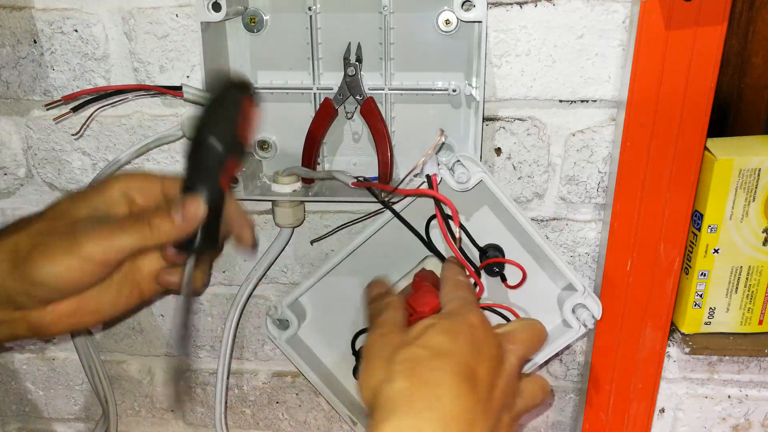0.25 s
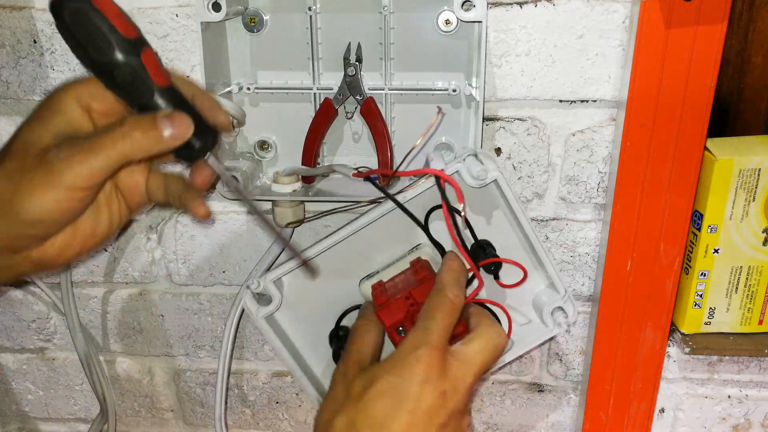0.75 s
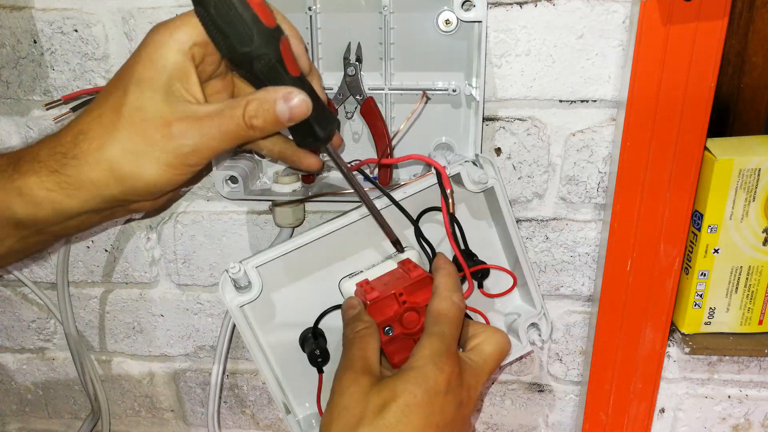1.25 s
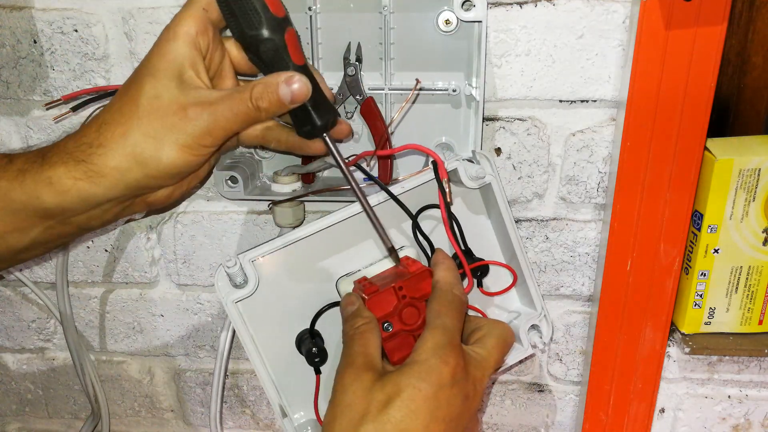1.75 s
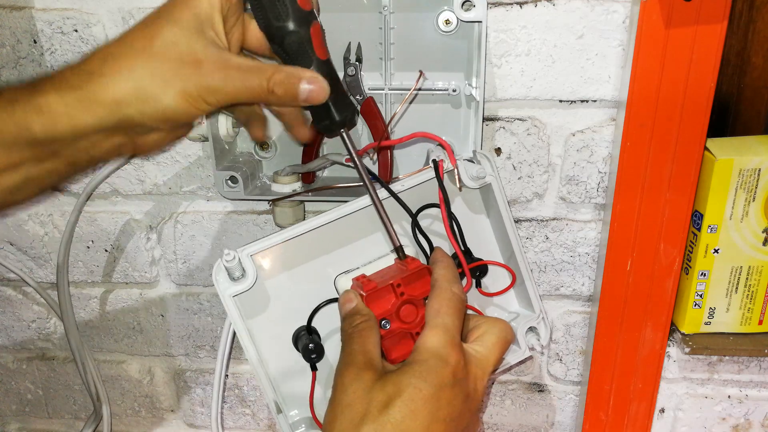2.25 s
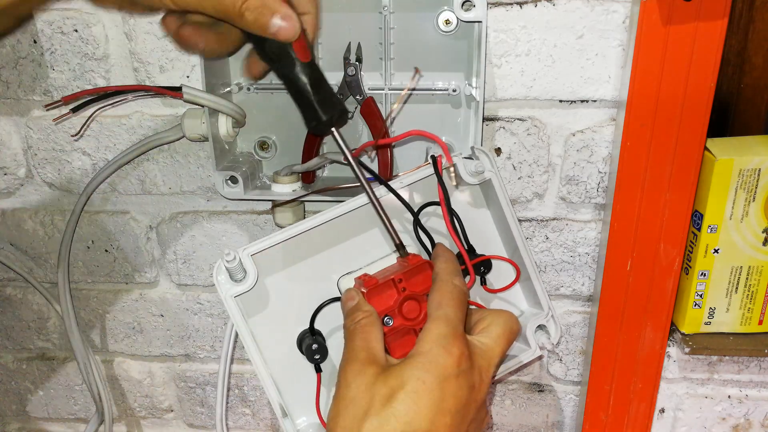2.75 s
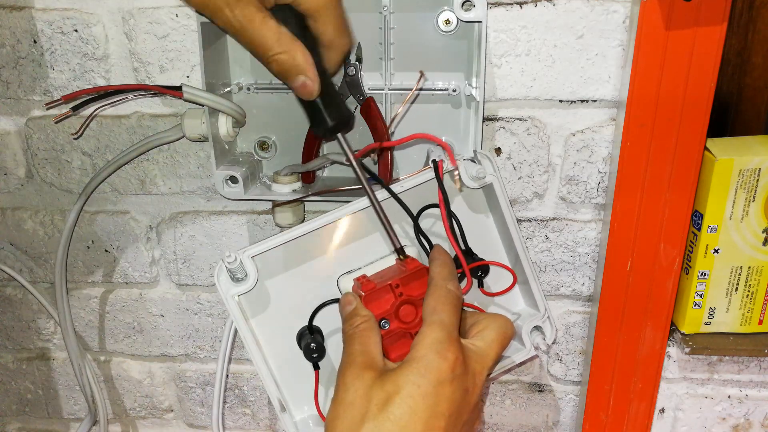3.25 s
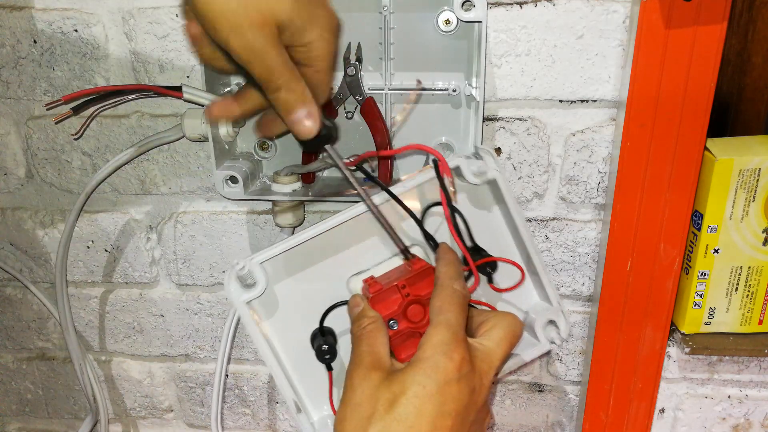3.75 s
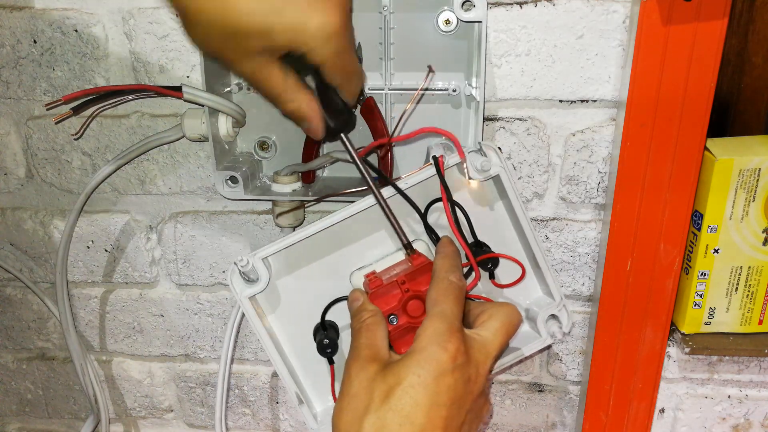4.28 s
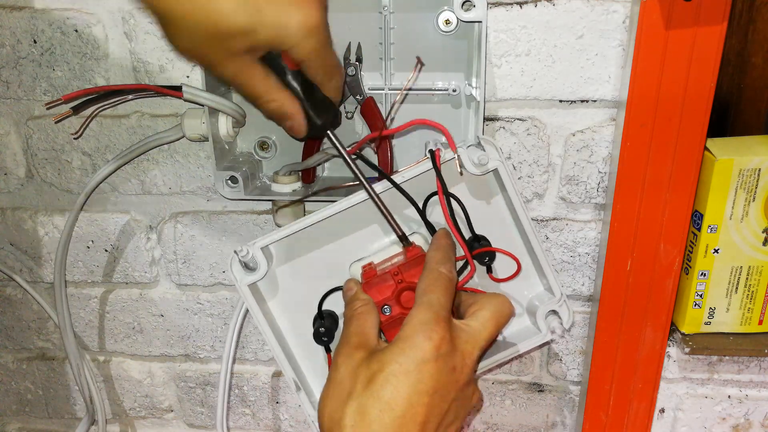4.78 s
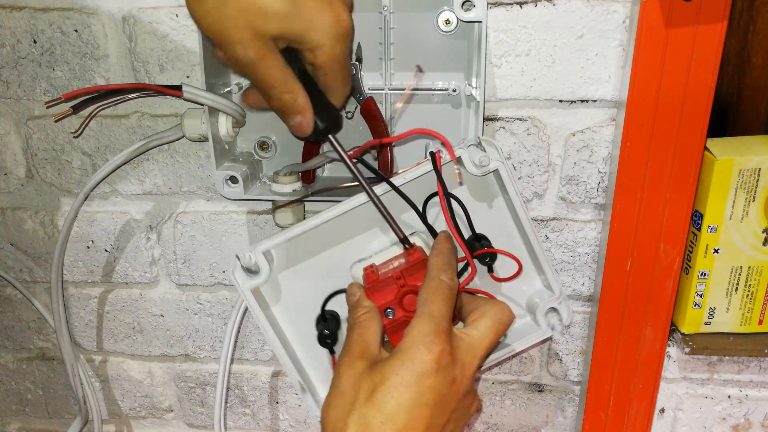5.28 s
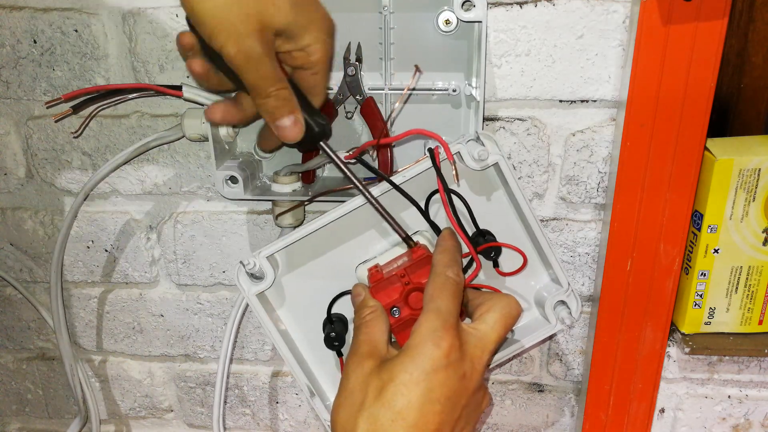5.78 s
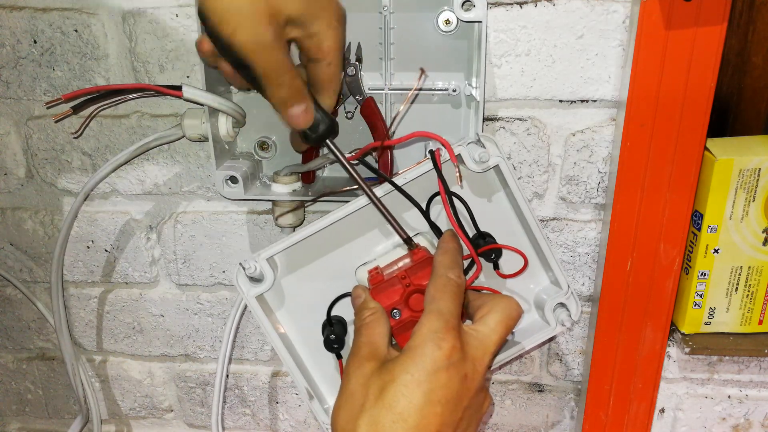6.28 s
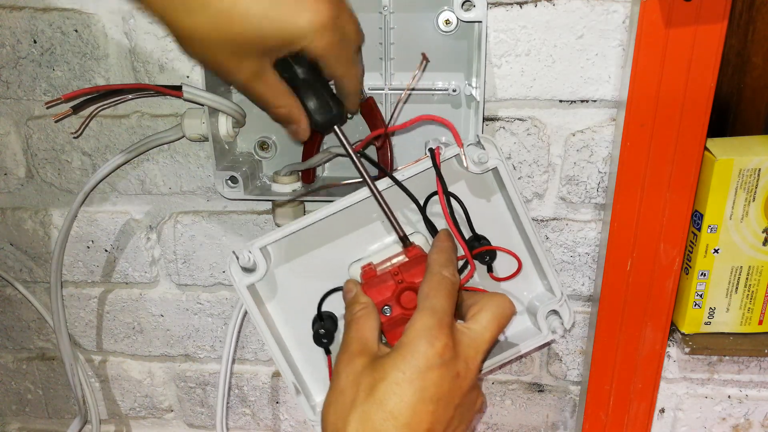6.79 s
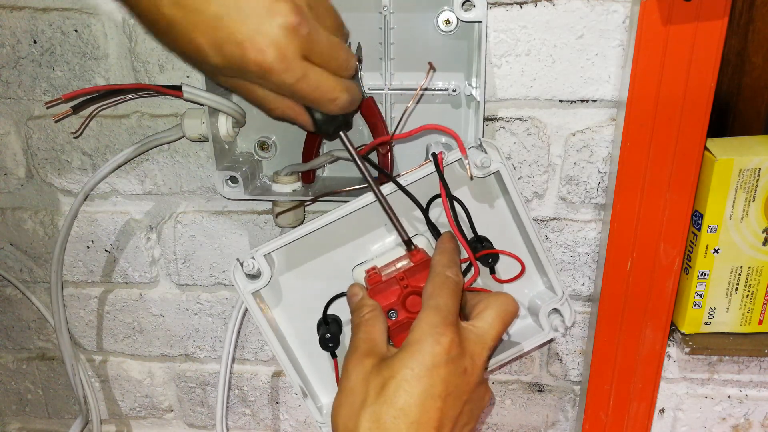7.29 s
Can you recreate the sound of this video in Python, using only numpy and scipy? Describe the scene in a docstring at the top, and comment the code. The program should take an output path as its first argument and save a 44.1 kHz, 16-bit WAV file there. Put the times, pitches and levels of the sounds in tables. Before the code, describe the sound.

A close stereo microphone hears screwdriver work left of centre in a small quiet room, with a quick brick-wall echo, short tail, low rumble and thin hiss. At 0.25-0.4 s the plastic fitting chatters softly as it is picked up; wires drag, and taps and knocks gather at 0.55-0.95, with a crack and slap at 0.7. After faint ticks and a tiny squeak near 1.15, gritty steel skids and squeaks cluster at 1.4-1.65 and 1.95-2.05. It is sparse until a knock and dry palm rub at 2.7-2.9. Light ticks lead to the loudest metal crack and plastic slap at 3.8, then a strong hollow knock near 4. Uneven knocks, tinks and taps continue, with a squeak at 4.77, a hard skid at 4.97, a busy clatter at 6.5-6.7, a low scuff and squeak at 6.9, and sparse light clicks to 7.5.

```python
"""A screwdriver tightens a small terminal screw in a plastic fitting held against a junction box lid.
Its tip clicks and slips in the screw head: short jerks and gritty noise ring the plastic and steel modes.
Uneven slips make squeaks, scrapes and a low scuff; wires drag in tiny catches; skin rubs as coloured noise.
A brick wall close behind gives one quick echo, and a small quiet room adds a noise tail and a low rumble."""
import sys
import numpy as np
from scipy import signal
from scipy.fft import rfft, irfft, next_fast_len
from scipy.io import wavfile

SR = 44100
rng = np.random.default_rng(int(sys.argv[2]) if len(sys.argv) > 2 else 0)


def int16_out(signal):
    """Quantize to a 16-bit WAV file."""
    q = np.round(np.clip(np.atleast_2d(signal).T, -1, 1) * 32767)
    wavfile.write(sys.argv[1], SR, q.astype(np.int16))


N = 332073
T = np.arange(N) / SR  # time in seconds


def amp(db):
    """Turns decibels into gain."""
    return 10 ** (np.asarray(db) / 20)


def unit(x):
    """Scales a sound to an rms of 1."""
    return x / np.sqrt(np.mean(x ** 2) + 1e-20)


def swell(t, middle, half):
    """A smooth rise and fall that peaks at 1."""
    return np.exp(-((t - middle) / half) ** 2)


def read(points, hz):
    """Reads a curve of (pitch, value) points, evenly spaced in log pitch."""
    point_hz, value = np.transpose(points)
    return np.interp(np.log(hz + 1), np.log(point_hz + 1), value)


def level_curve(points):
    """Joins (time, dB) points into a gain over time, near silent outside them."""
    s, db = np.transpose(points)
    return amp(np.interp(T, s, db, -120, -120))


def colour(x, points):
    """Filters by a smooth curve of (pitch_hz, level_db)."""
    hz = np.fft.rfftfreq(x.shape[-1], 1 / SR)
    return irfft(rfft(x) * amp(read(points, hz)), x.shape[-1])


def noise(points):
    """Coloured noise with an rms of 1."""
    white = rng.standard_normal(next_fast_len(N))
    return unit(colour(white, points)[:N])


def band(x, lo, hi, order=3):
    """Keeps the range from lo to hi in Hz."""
    return signal.sosfilt(signal.butter(order, [lo, hi], "band", fs=SR, output="sos"), x)


def grains(per_s, spread_db):
    """Tiny slips of uneven size at random moments, scaled to an rms of 1."""
    size = amp(spread_db * np.minimum(rng.exponential(1, N), 4)) * rng.standard_normal(N)
    happens = rng.random(N) < per_s / SR
    return unit(size * happens)


# what the fitting, lid and shaft ring with, before a small random spread: pitch_hz, width_hz, level_db
RINGING_MODES = [(513, 102, -27), (702, 74, -14.5), (998, 57, -14.5), (1311, 192, -5.5), (1530, 55, -8.5),
                 (1885, 132, -7.5), (2140, 120, -10.5), (2350, 105, -13), (2397, 340, -13.5),
                 (2600, 78, -20), (2930, 450, -13), (3480, 460, -16.5), (3810, 990, -16.5),
                 (4460, 250, -26), (5000, 800, -20.5), (5870, 50, -19), (6730, 390, -17), (7770, 110, -18),
                 (8120, 1700, -22.5), (9530, 230, -33), (12400, 1400, -35)]


def body(plastic_hz, favours, plastic_db=4, top_db=0):
    """Dying sine modes of the assembly; the point of contact favours some of the plastic and shaft modes."""
    t = T[:2600]
    hz, width, db = np.transpose(RINGING_MODES)[:, :, None]
    db = db + plastic_db * swell(hz, plastic_hz, 100)
    db = db + sum(lift_db * swell(hz, shaft_hz, 225) for shaft_hz, lift_db in favours)
    db = db + top_db * (hz > 10000)
    db = db + 1.5 * rng.standard_normal(hz.shape)
    hz = hz * (1 + .012 * rng.standard_normal(hz.shape))
    # upper mode shapes push or pull at the contact
    sign = np.where(hz > 1700, rng.choice([-1, 1], hz.shape), 1)
    # a wider mode dies sooner; the width factor keeps its peak level in the spectrum
    modes = sign * amp(db) * width * np.exp(-np.pi * width * t) * np.sin(2 * np.pi * hz * t)
    return modes.sum(0) * 2 * np.pi / SR


# the ranges of thud, plastic ring, shaft ring and tick: low_hz, high_hz
RANGES_HZ = [(520, 860), (930, 1780), (2020, 4500), (4950, 15200)]
RANGE_FILTERS = [signal.butter(order, edges, "band", fs=SR, output="sos")
                 for order, edges in zip((2, 4, 4, 4), RANGES_HZ)]


def contact(s, levels_db, slip_s, modes, slip_share, creep_s, scatter_db,
            snap_share=0.57, bare_db=-25, scatter_s=0.015):
    """The tip creeps, snaps and slips on grit; this rings the body and scatters differently to each side."""
    t = T[:2600] - T[132]  # the snap falls at 0, the creep starts 3 ms before
    grit = rng.standard_normal((3, len(t)))
    slip = grit[0] * np.exp(-abs(t) / np.where(t < 0, creep_s, max(2.5 * slip_s, .0003)))
    scatter = grit[1:] * np.exp(-abs(t) / scatter_s) * (t > 0)
    force = slip_share * slip / np.linalg.norm(slip)
    force = force + amp(scatter_db) * scatter / np.linalg.norm(scatter[0])
    snap = snap_share * (t == 0)
    ring = signal.fftconvolve(force + snap, modes[None], axes=1)[:, :len(t)]
    ring = ring + amp(bare_db) * (force + 0.2 * snap)  # some of the bare force is heard too
    sound = 0
    for db, sos in zip(levels_db, RANGE_FILTERS):
        part = signal.sosfilt(sos, ring)
        # each range gets its own level, set by its opening on the left
        strength = np.sqrt(np.sum(part[0, t < .012] ** 2) / (.01 * SR))
        sound = sound + amp(db) * part / strength
    return s + t[0], sound


def played(contacts, right_db=0):
    """Lays contacts out in time on both sides."""
    out = np.zeros((2, N))
    for s, sound in contacts:
        start = max(round(s * SR), 0)
        part = out[:, start:start + sound.shape[1]]
        part += sound[:, :part.shape[1]]
    return out * amp([[0], [right_db]])


# tone of the room's rumble and hiss: pitch_hz, level_db
FLOOR_COLOUR = [(12, -19), (20, 7), (48, 2), (146, -4), (347, -13.5), (388, -11.5), (422, -14.5),
                (802, -11.5), (949, -12), (1330, -13), (2080, -20.5), (3070, -19), (5680, -23.5),
                (6180, -24), (16000, -33.5)]
# how alike the left and right rumble are: pitch_hz, likeness (-1 to 1)
FLOOR_LIKENESS = [(60, 1), (130, 1), (290, 0.85), (640, -0.84), (1400, 0.34), (3000, -0.027)]
# swelling of the rumble; the filter below deepens it in the lowest range: start_s, level_db
RUMBLE_SWELLS = [(0, -1), (1.2, 0), (2.8, 0), (3.6, 0), (4.2, 2), (5.1, -0.5), (5.8, 1), (6.5, 0.5),
                 (7.53, -0.5)]


def floor(level_db=-53, left_db=1.2):
    """Low room rumble, alike on both sides and slowly swelling, under a thin steady hiss."""
    a, b = rfft(np.array([noise(FLOOR_COLOUR), noise(FLOOR_COLOUR)]))
    same = np.clip(read(FLOOR_LIKENESS, np.fft.rfftfreq(N, 1 / SR)), -1, 1)
    left = a * amp(left_db)
    right = same * a + np.sqrt(1 - same ** 2) * b
    bed = amp(level_db) * irfft(np.array([left, right]), N)
    low = colour(bed, [(170, 6), (400, -35), (900, -52)])
    return bed + low * (amp(np.interp(T, *np.transpose(RUMBLE_SWELLS))) - 1)


# wires dragging over the plastic, one list per drag, before gain_db: start_s, level_db
WIRE_DRAGS = [
    [(0.25, -49), (0.42, -67)],
    [(0.53, -54), (0.608, -50.5), (0.73, -41), (0.798, -41.5), (0.934, -51), (1.0, -60)],
    [(3.29, -51), (3.42, -71)],
    [(3.55, -65), (3.652, -60), (3.75, -84)],
    [(4.66, -53), (4.784, -46), (4.86, -44.5)],
]


def wires(gain_db=-2, resting_db=-67, soft_hz=3200):
    """Soft insulation catches on the plastic in tiny ringing slips; the held wires never lie quite still."""
    slips = grains(per_s=1300, spread_db=1.5)
    drag = signal.oaconvolve(slips, body(1850, [(2350, 4)], plastic_db=5))[:N]
    drag = unit(band(drag, 580, soft_hz))
    level = amp(gain_db) * sum(level_curve(rows) for rows in WIRE_DRAGS)
    return (level + amp(resting_db)) * drag


# tone of skin on the handle: pitch_hz, level_db
SKIN_TONE = [(1000, -7), (3500, 0), (6000, -0.5), (9000, 1), (12500, -5), (16000, -4)]
# fingertips sliding on the handle, before gain_db: middle_s, half_length_s, level_db
FINGER_STROKES = [(0.24, 0.023, -52), (3.169, 0.051, -54), (3.575, 0.033, -58.5), (3.685, 0.11, -52),
                  (4.11, 0.11, -54), (4.556, 0.057, -50.5), (4.887, 0.047, -57), (5.073, 0.058, -56),
                  (5.173, 0.037, -60), (6.335, 0.028, -53)]


def fingertips(gain_db=2):
    """A soft hiss of skin at each fresh hold on the handle."""
    level = sum(amp(db + gain_db) * swell(T, s, half_s) for s, half_s, db in FINGER_STROKES)
    return noise(SKIN_TONE) * level


# levels of the four ranges in a rattle tap: thud_db, plastic_ring_db, shaft_ring_db, tick_db
RATTLE_LEVELS = (-11.5, -1, -10, -20.5)
# shaft modes that rattle and taps bring out: pitch_hz, lift_db
TAP_LIFTS = [(2050, 11)]


def rattle(start_s=.274, gap_s=.0177, level_db=-41, spread_db=2, count=7, slip_s=0.0017,
           plastic_hz=1290, grind_db=-8, jitter_s=0.0019):
    """The fitting chatters on the lid as it is picked up: a loose chain of tiny, uneven taps."""
    chain = []
    for k, (late, hard) in enumerate(rng.standard_normal((count, 2))):
        s = start_s + k * gap_s + jitter_s * late
        levels_db = np.add(RATTLE_LEVELS, level_db + spread_db * hard)
        modes = body(plastic_hz, TAP_LIFTS, plastic_db=12, top_db=grind_db)
        chain.append(contact(s, levels_db, slip_s, modes, slip_share=0.42, creep_s=0.0013, scatter_db=-3.5))
    return played(chain)


# levels of the four ranges in a tap: thud_db, plastic_ring_db, shaft_ring_db, tick_db
TAP_LEVELS = (-21, 0.5, 1, -21)
# the fitting rocks and settles: start_s, level_db, shaft_ring_db (added to the shaft ring's level)
PLASTIC_TAPS = [(0.559, -45.5, -7), (0.68, -38, 5.5), (0.721, -35.5, -7), (0.8255, -37.5, -20),
                (1.0807, -48.5, -11), (2.457, -51, -12), (3.0725, -48.5, -13), (3.825, -27, -20),
                (4.253, -37.5, -8.5), (4.329, -40.5, -9), (4.487, -37.5, -11), (4.711, -38.5, -15),
                (5.0038, -37, -19), (5.351, -35.5, -11.5), (5.6912, -46, -19), (5.954, -38.5, -27),
                (6.267, -36, -15), (6.5527, -34, -21), (6.616, -29, -0.5), (6.6603, -31.5, -7.5),
                (6.781, -51, -2), (7.436, -40, -23)]


def taps(slip_s=0.0018, plastic_hz=1300, grind_db=-2, right_db=0.2):
    """The fitting rocks and settles in soft contacts that ring mostly the plastic."""
    hits = []
    for s, db, ring_db in PLASTIC_TAPS:
        levels_db = db + np.add(TAP_LEVELS, [0, 0, ring_db, 0])
        modes = body(plastic_hz, TAP_LIFTS, top_db=grind_db)
        hits.append(contact(s, levels_db, slip_s, modes, slip_share=0.81, creep_s=0.00082, scatter_db=-6.5))
    return played(hits, right_db)


# levels of the four ranges in a knock: thud_db, plastic_ring_db, shaft_ring_db, tick_db
KNOCK_LEVELS = (-7.5, 0.5, 0, -23.5)
# shaft modes that a knock brings out: pitch_hz, lift_db
KNOCK_LIFTS = [(2400, 6.7), (3550, 1)]
# the blade takes up its play at a turn and knocks the fitting on the lid:
# start_s, level_db, shaft_ring_db (added to the shaft ring's level), plastic_hz (favoured mode)
LID_KNOCKS = [(0.613, -38, -13, 1200), (0.791, -29.5, -16, 1300), (0.8824, -35, -13, 1210),
              (2.697, -29.5, -5, 1530), (3.9741, -24.5, -6.5, 1530), (4.2237, -31.5, -9.5, 1530),
              (4.278, -42.5, -3.5, 1280), (4.4739, -27, -9, 1430), (4.6505, -37, -7.5, 1530),
              (4.7705, -29, -7.5, 1010), (5.2898, -42, -19, 1530), (5.346, -33.5, -9, 1530),
              (5.582, -33, -1, 1430), (5.9289, -29.5, -4, 1500), (6.2449, -32, -15, 1530),
              (6.5323, -32, -10, 1530), (7.1421, -32, -9, 1530)]


def knocks(slip_s=0.00083, plastic_db=5, right_db=-.5):
    """The blade takes up its play and knocks the fitting on the lid: short, hollow blows under load."""
    hits = []
    for s, db, ring_db, plastic_hz in LID_KNOCKS:
        levels_db = db + np.add(KNOCK_LEVELS, [0, 0, ring_db, 0])
        modes = body(plastic_hz, KNOCK_LIFTS, plastic_db)
        hits.append(contact(s, levels_db, slip_s, modes, slip_share=0.94, creep_s=0.0013, scatter_db=-6.0))
    return played(hits, right_db)


# gritty squeaks and scrapes of the tip and screw, and one low scuff at 6.87 s:
# middle_s, half_length_s, level_db, pitch_hz
SQUEAKS_AND_SCRAPES = [(0.685, .01, -56, 2350), (0.748, 0.027, -56, 2500), (1.161, 0.008, -47.5, 2050),
                       (1.415, 0.016, -43, 2930), (1.607, 0.011, -46.5, 3900), (4.696, 0.025, -54, 2500),
                       (4.765, 0.017, -39, 2400), (6.87, 0.0058, -48, 600), (6.899, 0.023, -42, 2260)]


def squeaks_and_scrapes(width_hz=300, grit_db=1):
    """Fast uneven slips sound one resonance each, over a gritty scrape."""
    out = np.zeros(N)
    slips = grains(per_s=9000, spread_db=3)
    scrape = unit(colour(slips, [(500, -7.0), (1500, 0), (2600, 5), (3700, -2),
                                 (5200, -9), (7000, -4.0), (15000, -19)]))
    for s, half_s, db, hz in SQUEAKS_AND_SCRAPES:
        tone = unit(signal.lfilter(*signal.iirpeak(hz, hz / width_hz, SR), slips))
        out += amp(db) * swell(T, s, half_s) * (tone + amp(grit_db) * scrape)
    return out


# levels of the four ranges in the crack and the slap: thud_db, plastic_ring_db, shaft_ring_db, tick_db
CRACK_LEVELS = (-23, -9, 1.5, -7)
SLAP_LEVELS = (-28, 1.5, -28, -38)
# shaft modes that both bring out: pitch_hz, lift_db
CRACK_LIFTS = [(2490, 14.6), (3550, 10), (4400, 16)]
# the blade jumps and cracks on metal, then the fitting slaps back: start_s, crack_db, slap_db, crack_slip_s
BLADE_SNAPS = [(0.6986, -23.5, -26, .0019), (3.7835, -14.5, -19, 0.0011)]


def snaps(slap_after_s=.0066, slap_slip_s=0.00037, plastic_hz=1300, plastic_db=8, grind_db=-9, right_db=-1):
    """The blade jumps: a hard crack of the shaft, and a moment later the slap of the plastic."""
    hits = []
    for s, crack_db, slap_db, slip_s in BLADE_SNAPS:
        crack_modes = body(plastic_hz, CRACK_LIFTS, plastic_db, grind_db)
        hits.append(contact(s, np.add(CRACK_LEVELS, crack_db), slip_s, crack_modes,
                            slip_share=0.71, creep_s=0.0019, scatter_db=-8.5, bare_db=-31))
        slap_modes = body(plastic_hz, CRACK_LIFTS, plastic_db)
        hits.append(contact(s + slap_after_s, np.add(SLAP_LEVELS, slap_db), slap_slip_s, slap_modes,
                            slip_share=.5, creep_s=0.00094, scatter_db=-12))
    return played(hits, right_db)


# levels of the four ranges in a skid: thud_db, plastic_ring_db, shaft_ring_db, tick_db
SKID_LEVELS = (-13.5, 0, -5.5, -6.5)
# the tip skids over the screw head, steel grinding on steel:
# start_s, level_db, brightness_db, slip_s, shaft_hz (favoured mode)
TIP_SKIDS = [(0.896, -37, -3.5, 0.0032, 4100), (0.933, -46, -2, 0.0059, 3900),
             (1.382, -30, -1, .0024, 2930), (1.3995, -27, 3.5, .0025, 3650),
             (1.439, -35.5, -3.5, .004, 3840), (1.5277, -32.5, -1, 0.0022, 3850),
             (1.5698, -28.5, -11, .003, 4060), (1.58, -31, -4.5, 0.007, 4060),
             (1.609, -42, -10, 0.0015, 3900), (1.6299, -42.5, 4, 0.0014, 4150),
             (1.955, -26.5, -6.5, 0.0029, 2070), (1.984, -26, -0.5, .0018, 4070),
             (2.024, -31.5, -6.5, .0012, 3800), (2.028, -37.5, 5, 0.00097, 2930),
             (2.134, -46, -5, 0.0017, 4000), (2.707, -36, -5, .0016, 3450),
             (2.854, -31.5, -2.5, 0.0021, 3880), (3.58, -50.5, -4, 0.0032, 3150),
             (4.9665, -23, -5, 0.0026, 3870), (6.603, -23.5, -1.5, 0.0011, 2940),
             (6.626, -32.5, -6, 0.0062, 4000)]


def skids(plastic_hz=1250, plastic_db=5, shaft_db=10, shaft_follows=0.53,
          seated_s=2.4, hunting_grind_db=15.5, seated_grind_db=-10):
    """Long gritty slips; a harder bite has more tick and shaft ring, and a seated tip grinds less brightly."""
    hits = []
    for s, db, bright_db, slip_s, shaft_hz in TIP_SKIDS:
        levels_db = db + np.add(SKID_LEVELS, [0, 0, shaft_follows * bright_db, bright_db])
        # until seated_s the tip is still hunting for the screw head
        grind_db = hunting_grind_db if s < seated_s else seated_grind_db
        modes = body(plastic_hz, [(shaft_hz, shaft_db)], plastic_db, grind_db)
        hits.append(contact(s, levels_db, slip_s, modes, slip_share=0.93, creep_s=0.0015, scatter_db=-9,
                            snap_share=0.42, bare_db=-23.5))
    return played(hits)


# levels of the four ranges in a tink: thud_db, plastic_ring_db, shaft_ring_db, tick_db
TINK_LEVELS = (-9, -7, -3.5, -7)
# shaft modes that a tink brings out: pitch_hz, lift_db
TINK_LIFTS = [(2450, 6.5), (3550, 7.2)]
# the unloaded shaft ticks as the hand takes a new hold: start_s, level_db, brightness_db (added to the tick)
SHAFT_TINKS = [(0.909, -46, 9), (1.155, -43, -20), (2.1859, -37, -21), (3.207, -49.5, -13),
               (3.2936, -42.5, 10.5), (3.6735, -43, -13), (3.76, -41, -19), (3.891, -33.5, -15),
               (4.0249, -30, -3), (4.1533, -37, -1), (4.464, -41.5, -27), (4.8525, -46, -9),
               (5.4526, -41, -2.5), (5.633, -41, 2), (5.7649, -47.5, -8), (5.941, -48, 9), (6.1084, -41, 0),
               (6.252, -36.5, -4.5), (6.503, -45.5, -16), (6.8465, -35.5, -1), (6.9427, -41.5, -2),
               (7.1802, -47.5, 5.5), (7.408, -35, 1.5)]


def tinks(slip_s=0.001, plastic_hz=1370, grind_db=-2, ping_hz=3550, ping_decay_s=.0034, ping_db=6.5):
    """The unloaded shaft ticks on the screw: light metal contacts that all ring one clear, dying note."""
    t = T[:2600]
    ping = np.exp(-t / ping_decay_s) * np.sin(2 * np.pi * ping_hz * t)
    ping = np.tile(ping, (2, 1))  # the same on both sides
    hits = []
    for s, db, bright_db in SHAFT_TINKS:
        levels_db = db + np.add(TINK_LEVELS, [0, 0, 0, bright_db])
        modes = body(plastic_hz, TINK_LIFTS, top_db=grind_db)
        hits.append(contact(s, levels_db, slip_s, modes, slip_share=0.61, creep_s=0.0009, scatter_db=-11))
        hits.append((s, amp(db + ping_db) * ping))
    return played(hits)


# the palm sliding round the handle, before gain_db: start_s, level_db (of its 4.5-12 kHz range)
PALM_SLIDE = [(2.66, -55), (2.666, -76), (2.698, -56.5), (2.782, -38.5), (2.846, -45), (2.854, -41),
              (2.972, -68), (3.0, -64)]
# tone of the palm's rub: pitch_hz, level_db
PALM_COLOUR = [(150, -59), (250, -29), (335, -19.5), (474, -6.5), (729, -10), (978, -4.5), (1330, -9.5),
               (1530, -1.5), (2020, -7.5), (2440, -2.5), (4030, -5.5), (15500, -23.5)]


def grip(gain_db=3):
    """Dry skin sliding over the handle: a dense, even rub."""
    rub = noise(PALM_COLOUR)
    rub = rub / np.std(band(rub, 4500, 12000))
    return level_curve(PALM_SLIDE) * amp(gain_db) * rub


# tone of the right side against the left: pitch_hz, level_db
RIGHT_TONE = [(300, 7.5), (650, -11), (1200, 0.5), (1700, -4.5), (2600, -9), (4500, -8), (9000, -13),
              (15000, -13)]
# how far the right side trails in phase, beyond its delay: pitch_hz, phase_radians
RIGHT_PHASE = [(200, -1), (550, 1.5), (700, 3.5), (850, 5), (1000, 6.5), (1600, 6.5), (2300, 7.5),
               (3100, 6), (4000, 6.5), (5500, 5), (7500, 7.5)]


def ports(x, left_wall_s=.0053, right_wall_s=0.007, wall_db=-10, left_db=-0.2):
    """The work sits left of the microphone: its right port hears it later and duller; the wall echoes once."""
    echo = amp(wall_db) * colour(x, [(500, -32.0), (1500, -13), (4000, -5.5), (15000, 4.0)])
    left = x[0] + np.interp(T - left_wall_s, T, echo[0])
    right = x[1] + np.interp(T - right_wall_s, T, echo[1])
    right = np.roll(colour(right, RIGHT_TONE), 3)  # three samples later
    turn = np.exp(-1j * read(RIGHT_PHASE, np.fft.rfftfreq(N, 1 / SR)))
    right = irfft(rfft(right) * turn, N)
    return amp(left_db) * np.array([left, right])


# time the room takes to die away by 60 dB: pitch_hz, decay_s
ROOM_DECAY = [(400, 0.051), (1200, 0.34), (3000, 0.57), (7000, 0.5), (15000, 0.2)]


def room(x, wet_db=-11, build_s=0.0011):
    """A diffuse tail of dying noise: lows start strong but fade at once, the middle lasts longest."""
    hz, t, z = signal.stft(rng.standard_normal((2, SR // 2)), SR, nperseg=256)
    fade_db = -60 * t / read(ROOM_DECAY, hz)[:, None]
    start_db = read([(400, 16), (1200, 6), (3000, -4), (7000, -2.5), (15000, -14)], hz)[:, None]
    tail = signal.istft(z * amp(fade_db + start_db), SR, nperseg=256)[1]
    tail = tail * (1 - np.exp(-(T[:tail.shape[1]] / build_s) ** 2))  # echoes take a moment to build
    strength = np.sqrt(np.mean(abs(rfft(tail, SR)[:, 800:2000]) ** 2))  # between 800 and 2000 Hz
    return amp(wet_db) * signal.fftconvolve(x[None], tail / strength, axes=1)[:, :N]


def scene():
    """All the work at the terminal, heard direct and through the room."""
    handling = wires() + fingertips() + grip()
    work = handling + rattle() + taps() + knocks() + squeaks_and_scrapes() + snaps() + skids() + tinks()
    return ports(work) + room(work[0]) + floor()


def record(dry, low_cut_hz=32, high_cut_hz=15900):
    """The microphone's low cut and the recorder's band limit."""
    cut = signal.sosfilt(signal.butter(3, low_cut_hz, "high", fs=SR, output="sos"), dry)
    limit = signal.firwin(511, high_cut_hz, window=("kaiser", 9), fs=SR)
    return signal.oaconvolve(cut, limit[None], "same")


dry = scene()
out = record(dry)
int16_out(out)
```